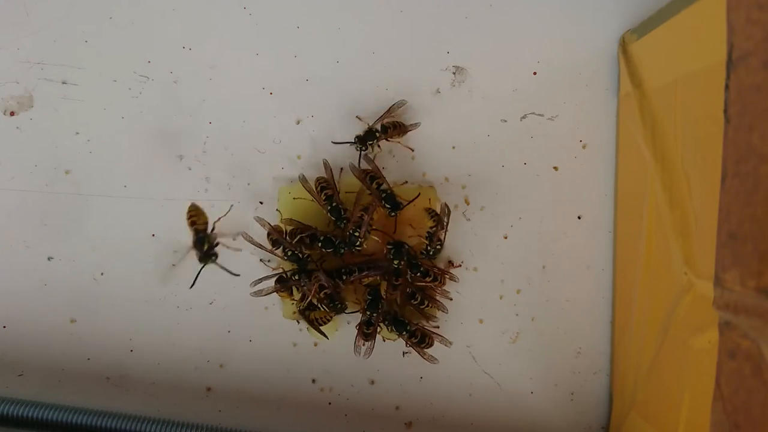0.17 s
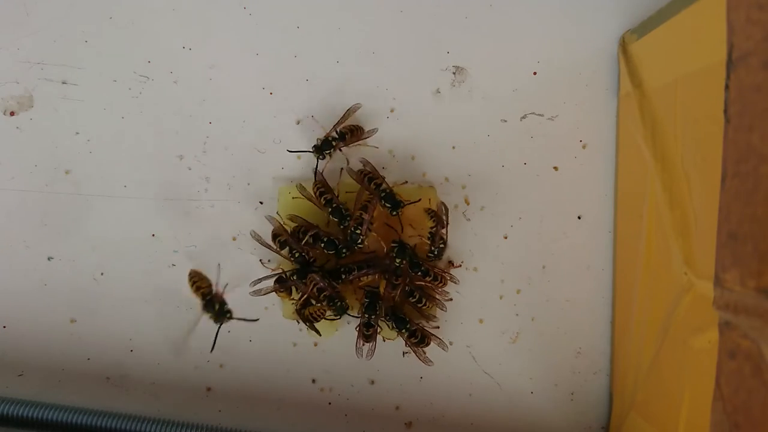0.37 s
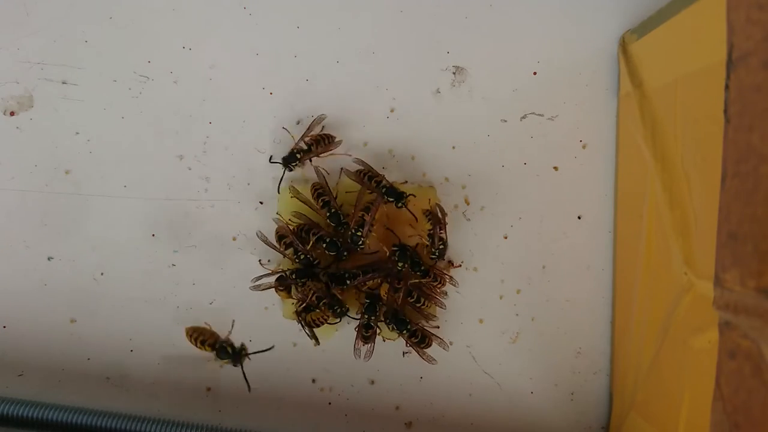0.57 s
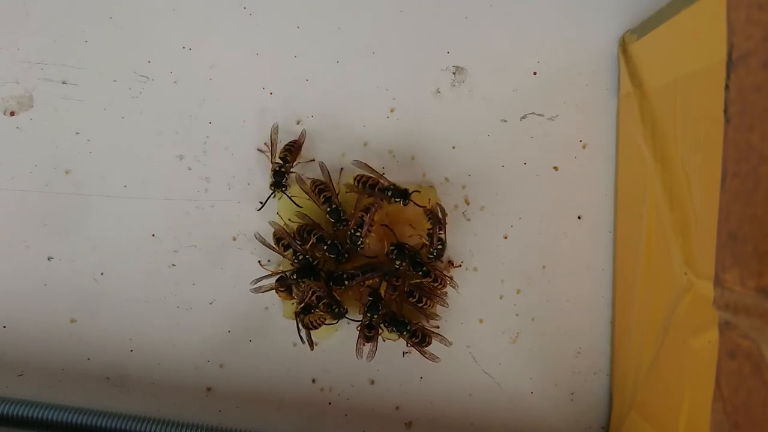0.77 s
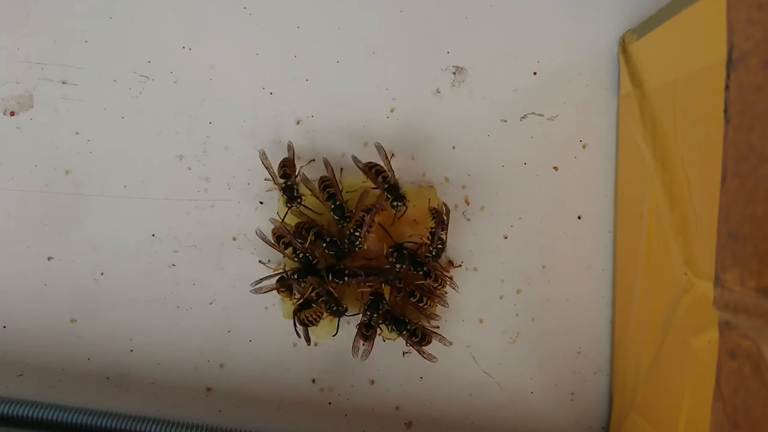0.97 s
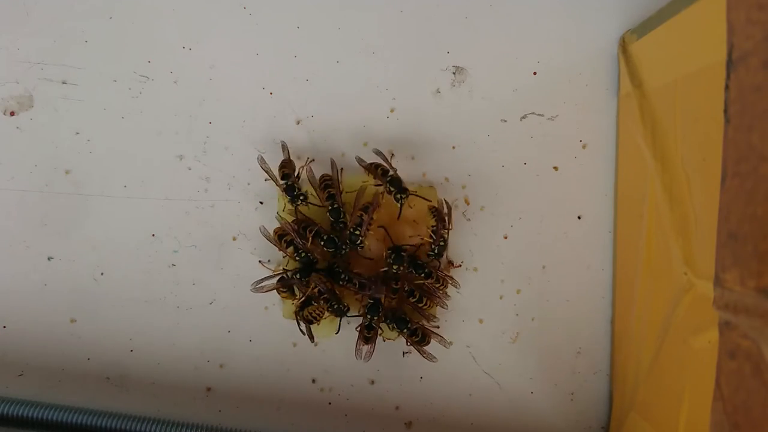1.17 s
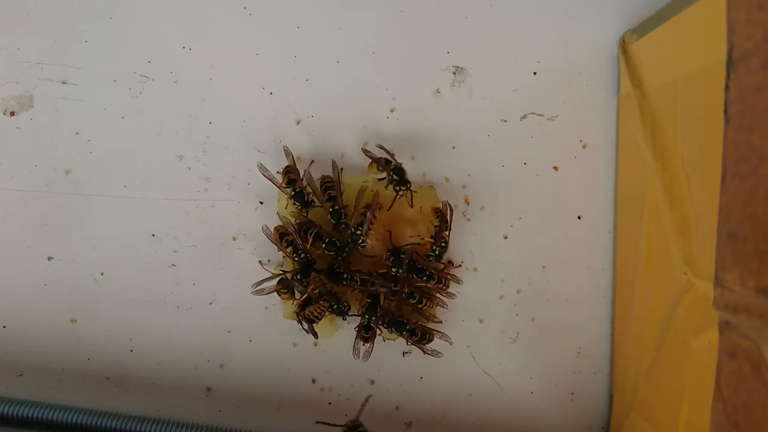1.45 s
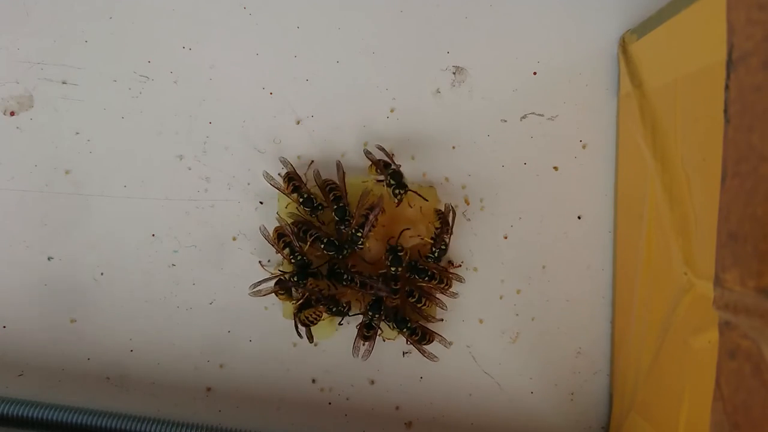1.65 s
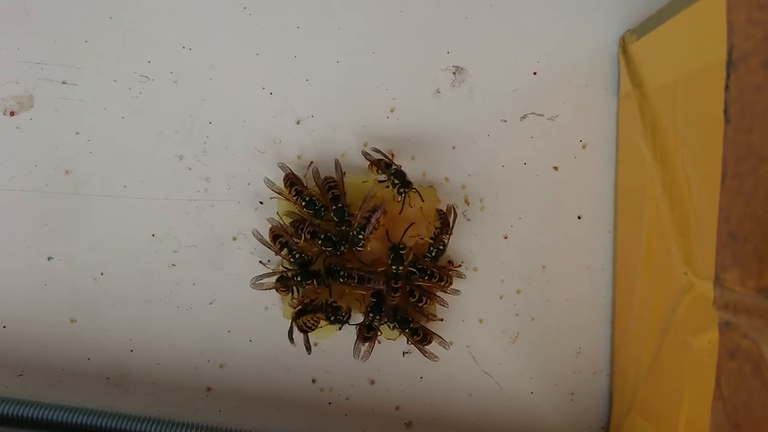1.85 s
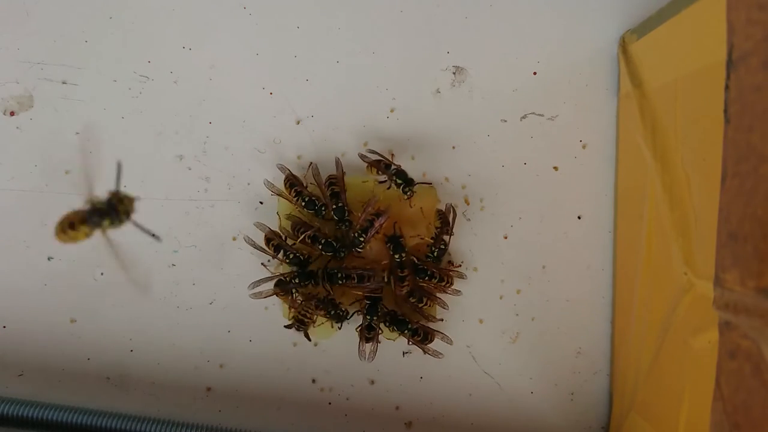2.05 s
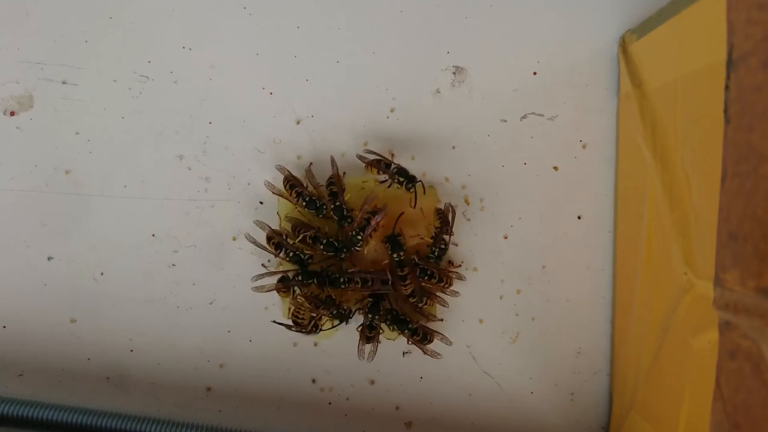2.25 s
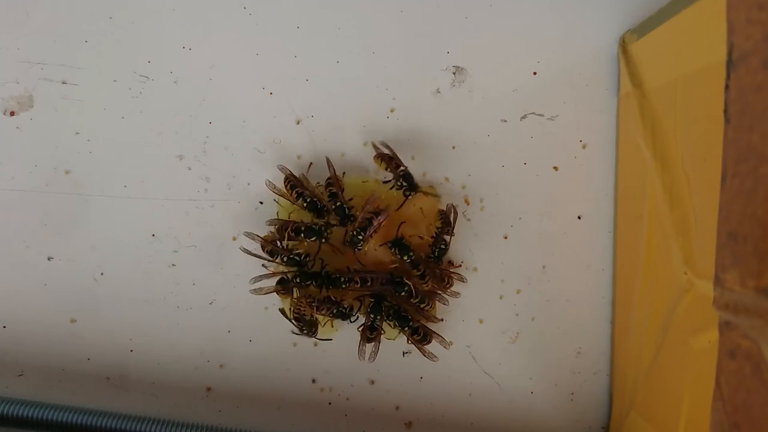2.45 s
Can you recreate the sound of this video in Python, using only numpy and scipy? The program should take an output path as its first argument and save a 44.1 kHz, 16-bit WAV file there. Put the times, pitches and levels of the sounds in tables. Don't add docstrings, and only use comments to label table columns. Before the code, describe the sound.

Close wasp wing buzz swells on the right, sags at each swerve, and recedes over quiet air

```python
import sys
import numpy as np
from scipy import signal
from scipy.io import wavfile
from scipy.ndimage import uniform_filter1d

SR = 44100
rng = np.random.default_rng(int(sys.argv[2]) if len(sys.argv) > 2 else 0)


def generate_wav(sig):
    pcm = np.round(np.clip(np.atleast_2d(sig).T, -1, 1) * 32767).astype(np.int16)
    wavfile.write(sys.argv[1], SR, pcm)


def decibels_to_gain(level_db):
    exponent = np.asarray(level_db, float) / 20
    return 10 ** exponent


N = 114660
T = np.arange(N) / SR


def rms_one(x):
    return x / np.sqrt(np.mean(x ** 2) + 1e-20)


def in_time(rows):
    s, *columns = np.transpose(rows)
    return [np.interp(T, s, c) for c in columns]


def at_hz(points, hz):
    table_hz, value = np.transpose(points)
    return np.interp(np.log(hz), np.log(table_hz), value)


def drift(rate):
    step = 40
    r = np.exp(-2 * step * np.pi * rate / SR)
    white = rng.standard_normal(N // step + 2002)
    slow = signal.lfilter([1], [1, -2 * r, r * r], white)[2000:]
    return np.interp(np.arange(N) / step, np.arange(len(slow)), rms_one(slow - slow.mean()))


def bump(s, length, edge=2):
    return np.exp(-.5 * np.abs((T - s) / length) ** edge)


def swells(events):
    return sum(decibels_to_gain(db) * bump(s, length) for s, length, db in events)


def left_gain(db):
    return decibels_to_gain([[db], [0]])


def band_pass(x, hz):
    return signal.sosfilt(signal.butter(2, hz, "band", fs=SR, output="sos"), x)


def narrow_noise(hz, width_hz, channels=2):
    r = np.exp(-np.pi * width_hz / SR)
    x = rng.standard_normal((channels, N + SR))
    for _ in range(2):
        x = signal.lfilter([1, 0, -1], [1, -2 * r * np.cos(2 * np.pi * hz / SR), r * r], x)
    return rms_one(x[:, SR:])


# (frequency [Hz], correlation [-1 to 1])
LIKENESS = [(60, 1), (240, -0.59), (950, 0.012), (3770, -0.0039), (15000, 0.14)]


def banded_noise(spectrum, patchy_db):
    out, together = 0, drift(3)
    edges = 27 * 2 ** np.arange(0, 9.6, .5)
    white = rng.standard_normal((2, 2, N))
    for k, (low, high) in enumerate(zip(edges, edges[1:])):
        mid, side = band_pass(white[k % 2], [low, high])
        hz = np.sqrt(low * high)
        alike = np.clip(at_hz(LIKENESS, hz), -1, 1)
        gain = decibels_to_gain(at_hz(spectrum, hz) + patchy_db * (0.57 * together + drift(11)))
        out = out + gain * (np.sqrt(1 + alike) * mid + np.sqrt(1 - alike) * side * [[1], [-1]])
    return rms_one(out)


# (frequency [Hz], density [dB per Hz])
AIR = [(30, -4), (55, -7), (130, 0.4), (260, -7.5), (850, -9.5), (1900, -16), (2700, -23.5), (4600, -24.5),
       (6000, -35), (15500, -37)]


def open_air():
    return decibels_to_gain(-46) * banded_noise(AIR, patchy_db=1.36) * left_gain(-5)


# (time [s], level [dB])
HUM = [(0, -34), (.3, -39), (.52, -44), (.7, -40), (.9, -42), (1.08, -37), (1.3, -43.5), (1.6, -38),
       (1.75, -57), (1.9, -41.5), (2.1, -50), (2.25, -38.5), (2.48, -57), (2.6, -37.5)]


def low_hum():
    wavering = narrow_noise(63.2, 3.5, channels=1)
    even = wavering / (np.abs(signal.hilbert(wavering)) + .5) ** 0.96
    return decibels_to_gain(in_time(HUM)[0]) * even * left_gain(-7)


def beat_phase(hz):
    return 2 * np.pi * np.cumsum(hz * (1 + 0.0063 * drift(46))) / SR


# (time [s], wing beat [Hz], level [dB], fundamental against second partial [dB],
# third partial against its usual share [dB])
FLIGHT = [(0, 181.3, -58, 0, 3), (.21, 179.1, -38, 2, 6), (.31, 181.1, -31.5, 0.5, 4.5),
          (.37, 180.3, -32, 5, 2), (.42, 171.9, -29.5, 1, 10.5), (.46, 181, -27.5, 9, 8),
          (.50, 174.8, -27, 6.5, 1.5), (.54, 178.5, -26.5, 2, 11.5), (.58, 175.4, -28, 1, 5),
          (.65, 176, -25, 0.5, 6.5), (.69, 182.2, -22.5, -3.5, 9.5), (.78, 177.1, -22.5, -0.5, 7.5),
          (.82, 175, -23, -5, 10), (.88, 179.3, -22, -2, 8), (.91, 180, -23, -1.5, 9.5),
          (.98, 175.9, -24.5, 1, 11), (1.015, 177.6, -24, 0.5, 16.5), (1.04, 165.6, -23, 4, 9),
          (1.06, 169.2, -23, 8, 0), (1.08, 176.5, -23.5, -4.5, 18), (1.10, 168.2, -26, 3, 13),
          (1.14, 177.2, -25.5, 1, 14.5), (1.20, 177.6, -31.5, 6, 16), (1.24, 175.4, -33, 0, 9),
          (1.275, 173.1, -37, 9, 26.5), (1.305, 170, -38, 11, 22.5), (1.35, 174.1, -38.5, 1.5, 11.5),
          (1.378, 172.3, -39, -8, 0), (1.40, 170.2, -51.5, 4, 8), (1.47, 174.4, -46.5, -0.5, 6),
          (1.55, 168.8, -52, 5.5, 6), (1.62, 168, -53.5, 10.5, 24), (1.67, 171.7, -47, 8, 2),
          (1.72, 167.8, -50.5, 10.5, 18.5), (1.78, 172.4, -45, 8.5, 11), (1.82, 166.5, -47, 1, 11),
          (1.87, 151.9, -72, 9, 5)]
# (time [s], length [s], sag [Hz], overtone loss [dB], fundamental loss [dB])
SWERVES = [(0.154, 0.031, 17.3, 3, -1), (0.251, 0.033, 9.7, 3.5, -2), (0.401, 0.011, 11, 7.5, 0.5),
           (0.438, 0.019, 16, 5.5, 4), (0.48, 0.014, 5.95, 4.5, 2.5), (0.594, 0.012, 10.6, 4, 2.5),
           (.620, 0.016, 13, 5.5, 0.5), (0.728, 0.026, 28.8, 11.5, 7), (0.828, 0.023, 9.3, 1.5, 0.5),
           (0.847, 0.012, 15.3, 6, 7), (0.938, 0.024, 20.7, 10, 5), (1.03, 0.01284, 9.295, 7.5, 0),
           (1.12, 0.01675, 11.3, 0, 6.5), (1.151, 0.011, 10.77, 6, 8), (1.178, 0.0167, 11.86, 10, 3.5),
           (1.278, 0.022, 9.2, 7, -0.5), (1.326, 0.0088, 2, 9.5, 0.5), (1.603, 0.029, 3.5, 8, -1)]


def swerving_flight():
    hz, level_db, facing_db, third_db = in_time(FLIGHT)
    first_db, loss_db = facing_db, np.zeros(N)
    recovery_stretch, edge = 1.7, 3
    for s, length, sag_hz, over_db, own_db in SWERVES:
        before = bump(s, length / 2, edge)
        after = bump(s, recovery_stretch * length / 2, edge)
        shape = np.where(T < s, before, after)
        hz = hz - sag_hz * shape
        loss_db = loss_db + over_db * shape
        first_db = first_db - own_db * shape
    upper_db = np.maximum(0.53 * loss_db + 0.76 * (facing_db - first_db), -2)
    level_db = level_db - 900 * np.maximum(T - FLIGHT[-1][0], 0)
    return hz, level_db, facing_db, first_db, third_db, loss_db, upper_db


# (frequency [Hz], density [dB per Hz])
WING_AIR = [(70, -17.5), (400, 5), (1800, -11), (3000, -17), (4500, -21.5), (5800, -26), (7000, -14),
            (11000, -32), (15500, -19)]


def wing_air(snap, level_db, upper_db):
    gate = np.exp(0.99 * (0.18 * np.cos(snap) + 0.57 * np.cos(2 * snap)))
    air_db = -39.5 + 0.58 * (level_db - upper_db + 32.5)
    air_db = air_db + 0.5 * level_db * (T > FLIGHT[-1][0])
    return decibels_to_gain(air_db) * rms_one(gate * banded_noise(WING_AIR, patchy_db=1))


# (multiple of the wing beat, level [dB])
PARTIALS = [(1, 2), (2, 4.5), (3, -13.5), (4, -13.5), (5, -12.5), (6, -12.5), (7, -13.5), (8, -21),
            (9, -19), (10, -20), (11, -24.5), (12, -53)]
# (time [s], length [s], level [dB])
FLARES = [
    (0.451, 0.01, 6),
    (0.596, 0.016, 3),
    (1.046, 0.007, 3),
    (1.261, 0.0094, 2),
]
# (time [s], multiple of the wing beat, depth [dB])
NULL = [(.2, 5.01, 0), (.36, 5.01, 5), (.42, 5.2, 9), (.46, 7.2, -3.5), (.50, 4.3, 10), (.53, 5.01, 33),
        (.58, 5.01, 9), (.61, 6.2, 1), (.66, 5.2, 24), (.70, 5.01, 12), (.80, 5.6, 17), (.85, 6.5, 2),
        (.90, 5.1, 17), (.93, 5.5, 12), (.98, 4.9, 21), (1.0, 4.1, 14), (1.04, 3.2, 18), (1.065, 6.01, 10),
        (1.085, 5.01, 18), (1.12, 6.01, 5), (1.15, 4.3, 1), (1.18, 6.01, 11), (1.22, 4.4, 15),
        (1.24, 5.01, 24), (1.30, 6.01, 7), (1.36, 5.01, 23), (1.5, 6.01, -10)]
LEAK_BAND = [1850, 4860]


def near_wasp():
    hz, level_db, facing_db, first_db, third_db, loss_db, upper_db = swerving_flight()
    null, null_db = in_time(NULL)
    roll_db = 0.91 * np.minimum(facing_db, 6) + sum(db * bump(s, length) for s, length, db in FLARES)
    phase, out = beat_phase(hz), 0
    stroke_lag = 3.06 * (1 + 0.24 * drift(8.8))
    sweep_rad, sweep_top = .14, 13
    rasp = [(k, -31.5 - .3 * (k - 13) - 3.5 * max(k - 21, 0)) for k in range(13, 29)]
    for k, db in [*PARTIALS, *rasp]:
        k = round(k)
        if k == 1:
            change_db = first_db
        else:
            change_db = 1.3 * min(k - 2, 3) / 3 * drift(7.8)
            change_db = change_db - null_db * np.exp(-.5 * ((k - null) / 0.5) ** 2)
        if k == 2:
            change_db = change_db - loss_db
        if k == 3:
            change_db = change_db - 1.29 * loss_db + third_db
        if k > 3:
            change_db = change_db - upper_db + 0.034 * third_db
        if k in (4, 5):
            change_db = change_db + roll_db
        late = sweep_rad * min(k, sweep_top) * (2 * k - min(k, sweep_top))
        angle = k * phase + stroke_lag * (k == 1) - late
        angle = angle + .13 * (1 + .1 * k) * drift(10)
        out = out - np.sqrt(2) * decibels_to_gain(level_db + db + change_db) * np.sin(angle)
    air = wing_air(phase - 2 * sweep_rad * sweep_top, level_db, upper_db)
    right = out + air[1]
    leak = decibels_to_gain(-25.5) * band_pass(right + decibels_to_gain(11) * air[0], LEAK_BAND)
    return np.array([decibels_to_gain(-60) * right + leak, right])


def drone(path, partials):
    hz, level_db, left_db = in_time(path)
    phase = beat_phase(hz)
    tone = sum(decibels_to_gain(db + 2.89 * drift(35)) * np.sin(round(k) * phase + k) for k, db in partials)
    tone = tone * decibels_to_gain(level_db) * (T > path[0][0]) * (T < path[-1][0])
    return tone * np.array([decibels_to_gain(left_db / 2), decibels_to_gain(-left_db / 2)])


# (time [s], wing beat [Hz], level [dB], left against right [dB])
FAR_WASP = [(0, 182, -56, 0), (.3, 180, -60, 0), (.5, 180, -70, 0), (1.4, 180, -66, 6), (1.6, 178, -58, 8),
            (1.7, 171, -57, 8), (1.77, 184, -60, 8), (1.9, 178, -64, 8), (2.0, 182, -59, 7),
            (2.07, 173, -58, 7), (2.15, 180, -55, 5), (2.25, 185, -53, 5), (2.32, 169, -56, 8),
            (2.39, 187, -52, 4), (2.47, 172, -56, 9), (2.55, 162, -55, 10), (2.6, 170, -57, 10)]
# (multiple of the wing beat, level [dB])
FAR_PARTIALS = [(1, -5), (2, 1.5), (3, -27), (4, -12), (6, -12)]


def far_wasp():
    return drone(FAR_WASP, FAR_PARTIALS)


# (time [s], length [s], level [dB])
CHIRPS = [
    (0.04, 0.026, -62),
    (0.218, 0.019, -53),
    (0.515, 0.13, -57.5),
    (0.885, 0.11, -54.5),
    (2.076, 0.024, -61.5),
    (2.207, 0.045, -64),
]


def birds():
    return swells(CHIRPS) * narrow_noise(4450, 500)


# (time [s], length [s], level [dB])
RUSTLES = [
    (0.057, 0.071, -43.5),
    (0.246, 0.058, -44.5),
]
# (frequency [Hz], density [dB per Hz])
RUSTLE = [(60, 18), (400, 10.5), (1400, 8), (4500, 4), (6000, -8.5), (15000, -49)]


def leaves():
    return swells(RUSTLES) * banded_noise(RUSTLE, patchy_db=2.5)


def traffic():
    flicker_db = 0.94 * drift(14.5)
    return decibels_to_gain(-48.5 + flicker_db) * bump(1.26, 0.3) * narrow_noise(860, 495)


# (time [s], length [s], pitch [Hz], rise [Hz per s], level [dB])
FAR_TONES = [
    (1.437, 0.031, 853, -200, -54),
    (1.643, 0.029, 883, 0, -63),
    (2.115, 0.014, 104.9, 908, -43.5),
    (2.12, 0.011, 900, 0, -49),
    (2.291, .022, 920, 600, -60),
]


def far_tones():
    out = 0
    for s, length, hz, rise, db in FAR_TONES:
        cycles = (hz + rise * (T - s) / 2) * (T - s)
        out = out + decibels_to_gain(db) * bump(s, length) * np.sin(2 * np.pi * cycles)
    return decibels_to_gain(5 * drift(25)) * out


# (time [s], wing beat [Hz], level [dB], left against right [dB])
SLOW_WASP = [
    (1.80, 160.9, -62, -32),
    (1.87, 150, -58, -32),
    (2.0, 150.9, -56, -26),
    (2.15, 152.8, -54.5, -21.5),
    (2.26, 147.6, -64, -23),
]
# (multiple of the wing beat, level [dB])
SLOW_PARTIALS = [(1, 1.5), (2, -6.5), (3, -6), (4, -26)]


def slow_wasp():
    return drone(SLOW_WASP, SLOW_PARTIALS)


def ducking(loud, knee_db, slope):
    power = uniform_filter1d(loud ** 2, int(0.17 * SR)) + 1e-12
    return decibels_to_gain(-slope * np.maximum(10 * np.log10(power) - knee_db, 0))


def scene():
    wasp = near_wasp()
    surroundings = open_air() + low_hum() + far_wasp() + birds() + leaves()
    surroundings = surroundings + traffic() + far_tones() + slow_wasp()
    return wasp + ducking(wasp[1], knee_db=-24, slope=0.81) * surroundings


def top_cut(x):
    return signal.sosfilt(signal.butter(12, 16380, fs=SR, output="sos"), x)


LEFT_DIP_BAND = [150, 740]


def record(dry):
    left, right = signal.sosfilt(signal.butter(3, 42, "high", fs=SR, output="sos"), dry)
    band = signal.sosfiltfilt(signal.butter(2, LEFT_DIP_BAND, "band", fs=SR, output="sos"), left)
    top = signal.sosfiltfilt(signal.butter(8, 11800, "high", fs=SR, output="sos"), left)
    left = left - band * (1 - ducking(right, knee_db=-51, slope=0.87))
    left = left + top * ducking(right, knee_db=-41, slope=3)
    mix = signal.sosfilt(signal.cheby2(14, 60, 16000, fs=SR, output="sos"), [left, right])
    return top_cut(mix)


dry = scene()
out = record(dry)
generate_wav(out)
```